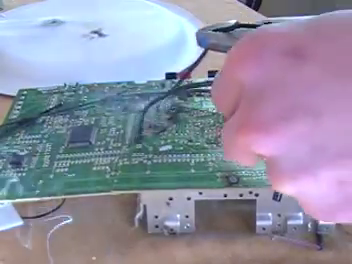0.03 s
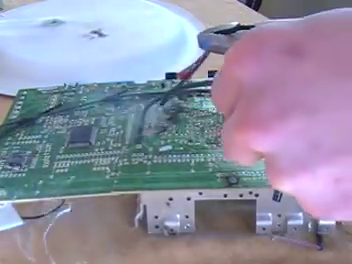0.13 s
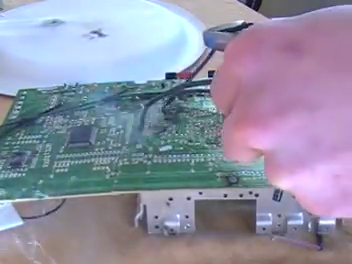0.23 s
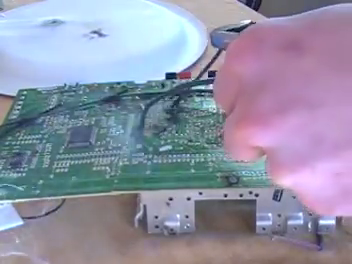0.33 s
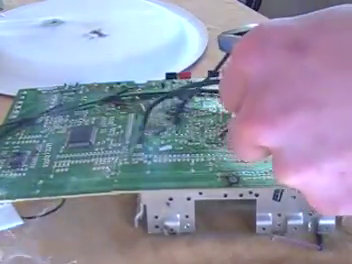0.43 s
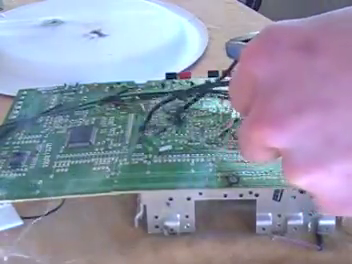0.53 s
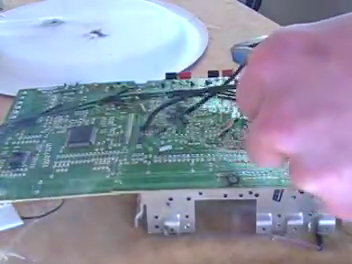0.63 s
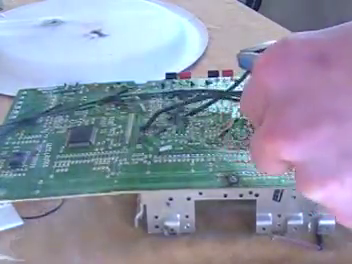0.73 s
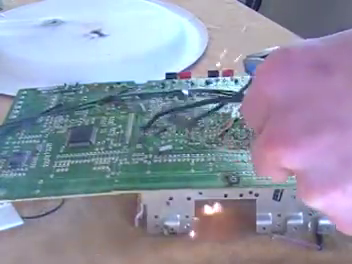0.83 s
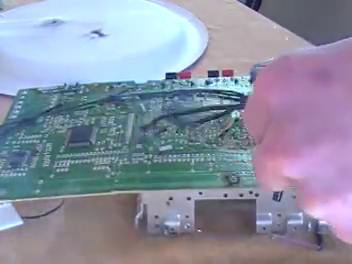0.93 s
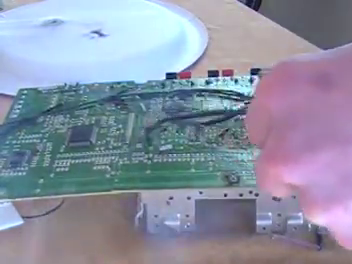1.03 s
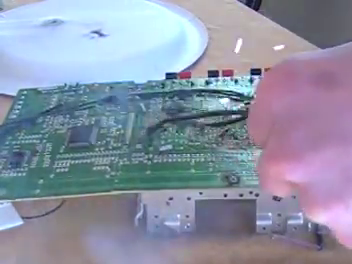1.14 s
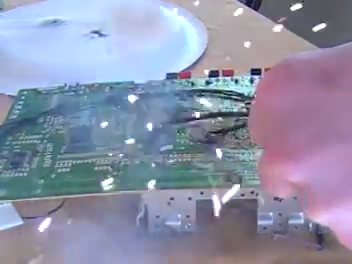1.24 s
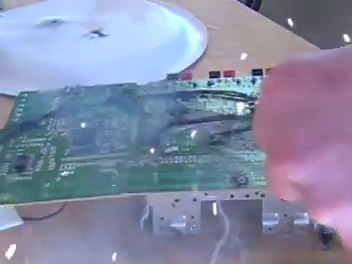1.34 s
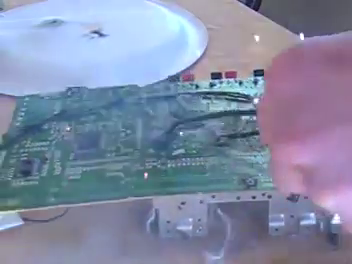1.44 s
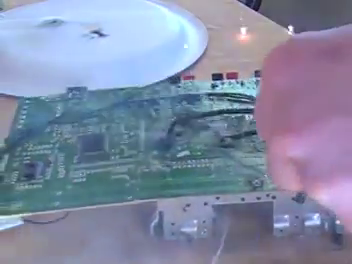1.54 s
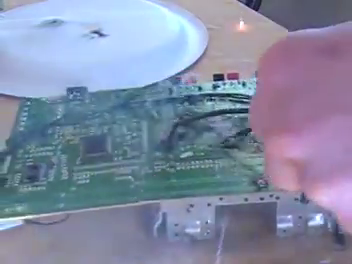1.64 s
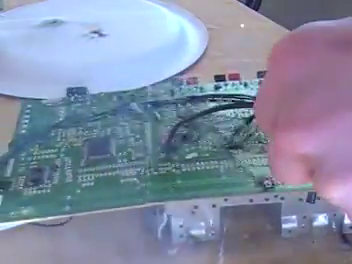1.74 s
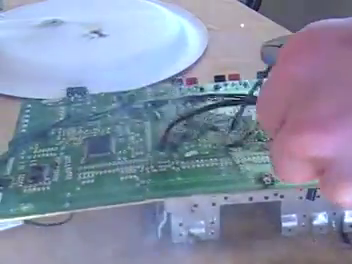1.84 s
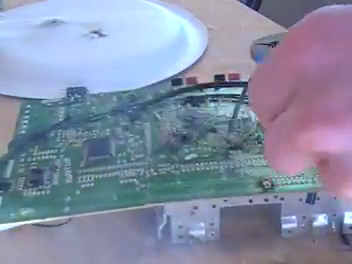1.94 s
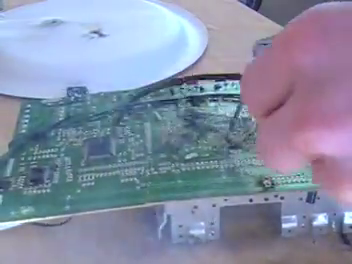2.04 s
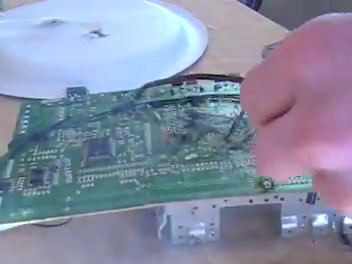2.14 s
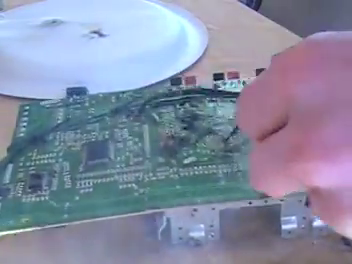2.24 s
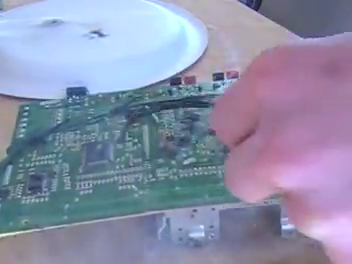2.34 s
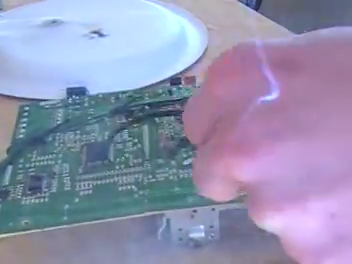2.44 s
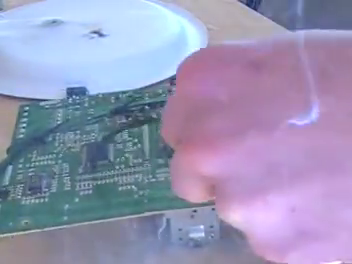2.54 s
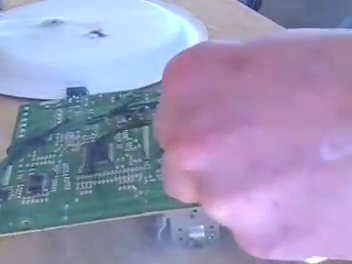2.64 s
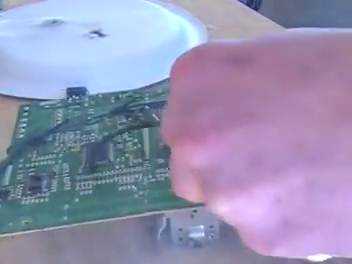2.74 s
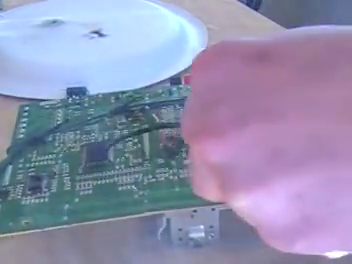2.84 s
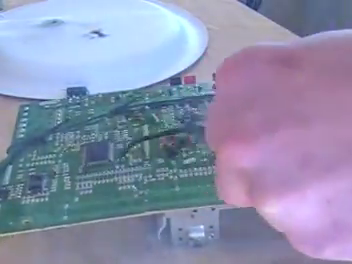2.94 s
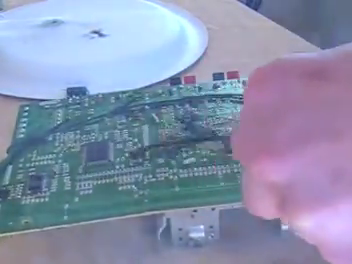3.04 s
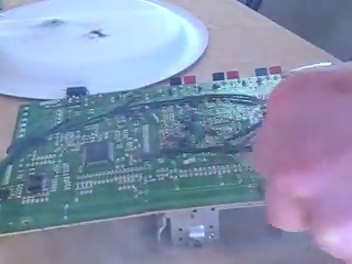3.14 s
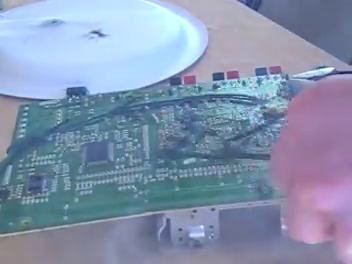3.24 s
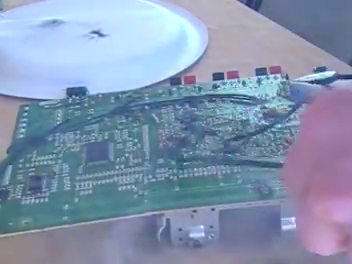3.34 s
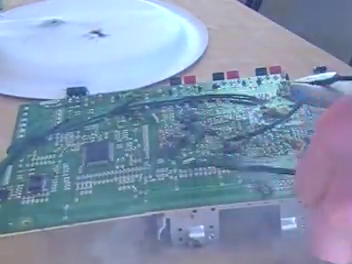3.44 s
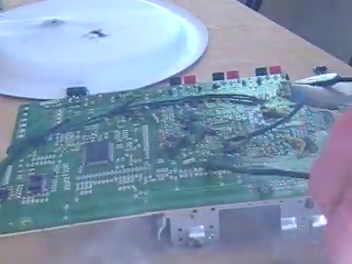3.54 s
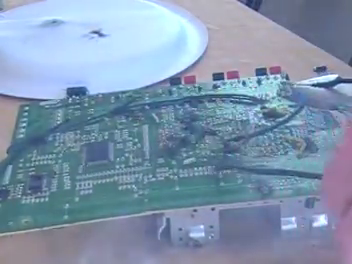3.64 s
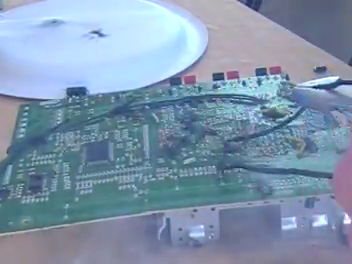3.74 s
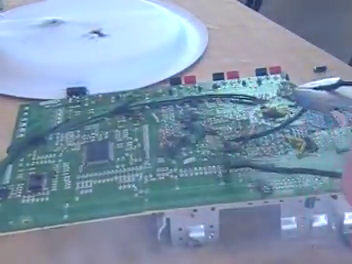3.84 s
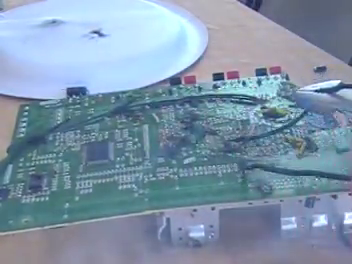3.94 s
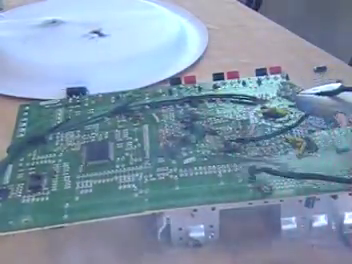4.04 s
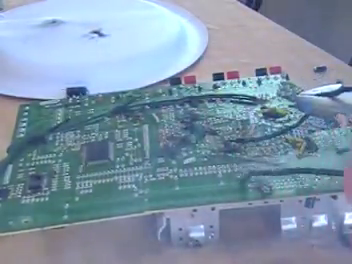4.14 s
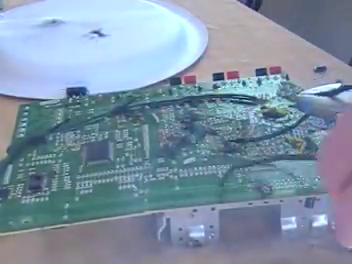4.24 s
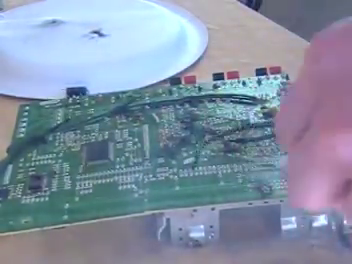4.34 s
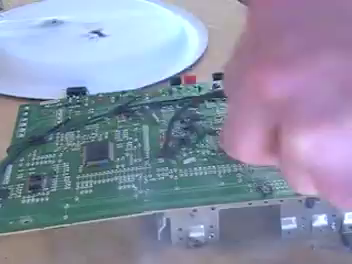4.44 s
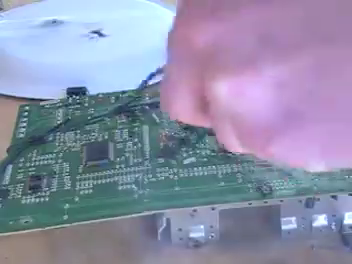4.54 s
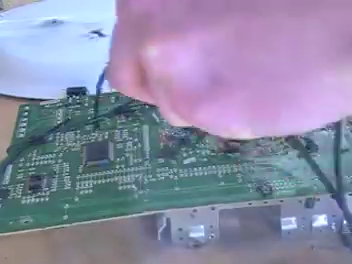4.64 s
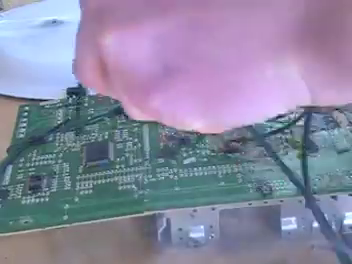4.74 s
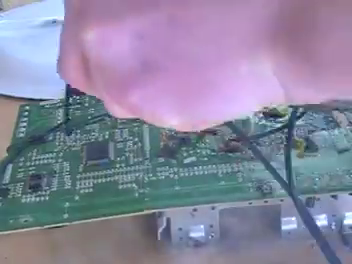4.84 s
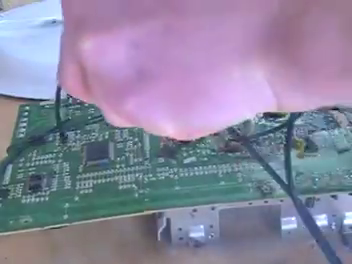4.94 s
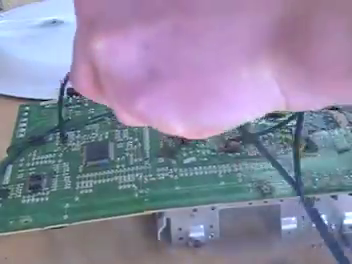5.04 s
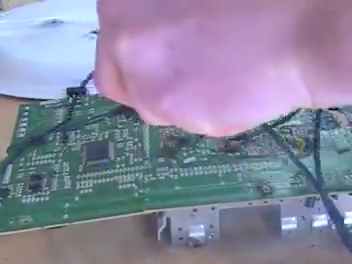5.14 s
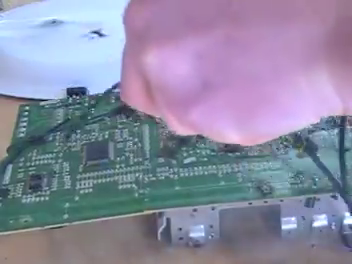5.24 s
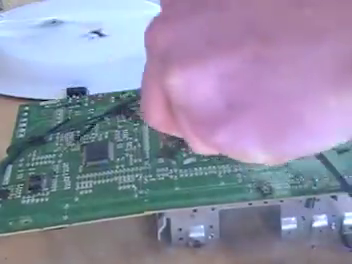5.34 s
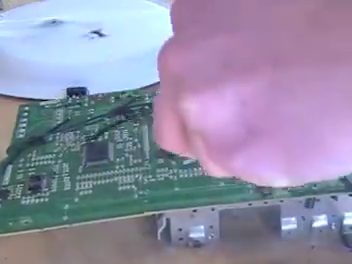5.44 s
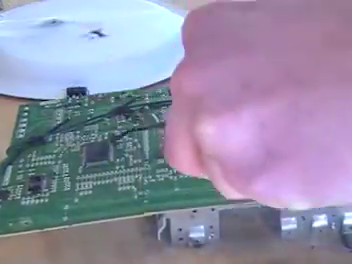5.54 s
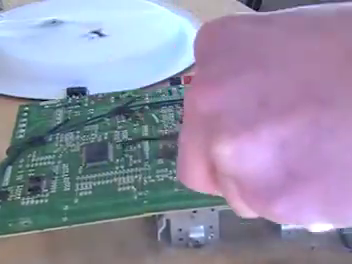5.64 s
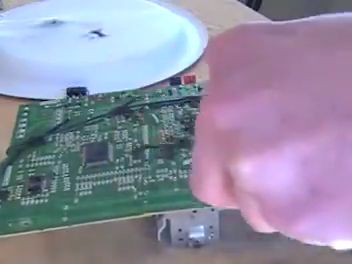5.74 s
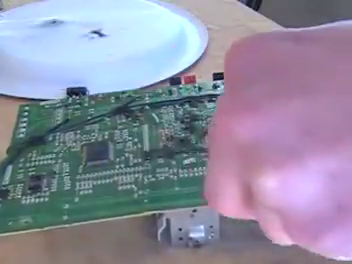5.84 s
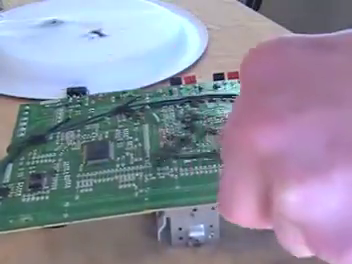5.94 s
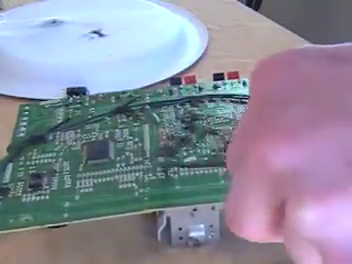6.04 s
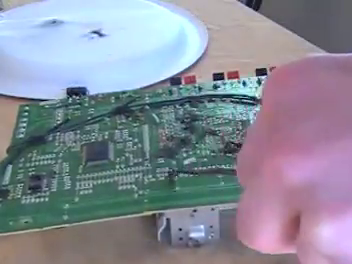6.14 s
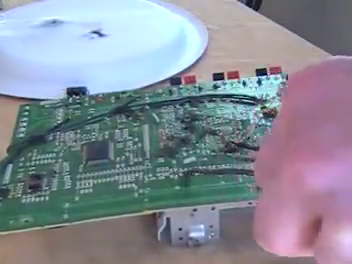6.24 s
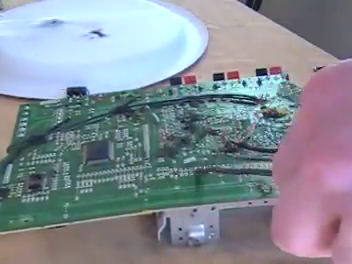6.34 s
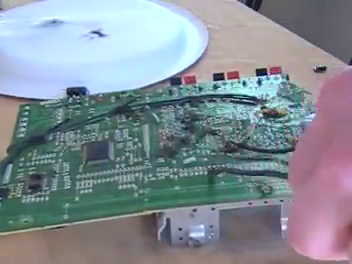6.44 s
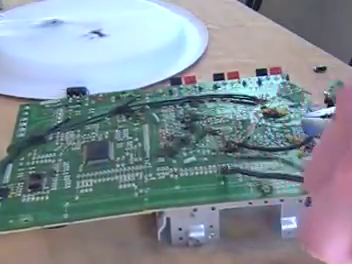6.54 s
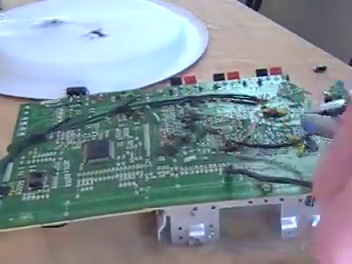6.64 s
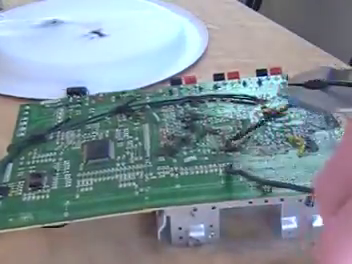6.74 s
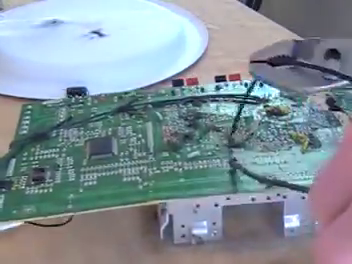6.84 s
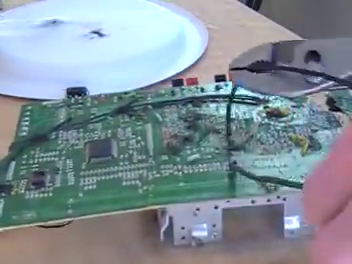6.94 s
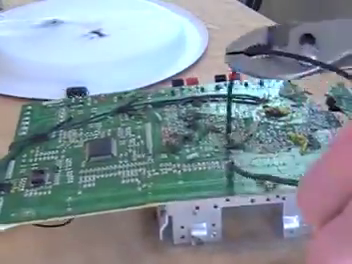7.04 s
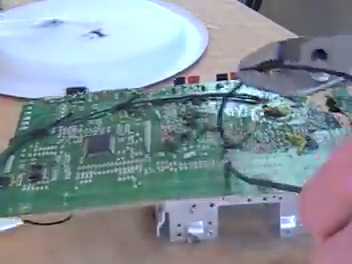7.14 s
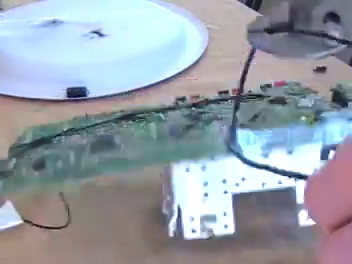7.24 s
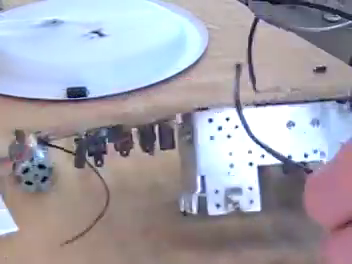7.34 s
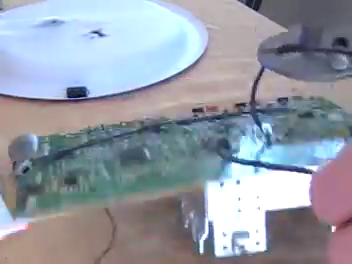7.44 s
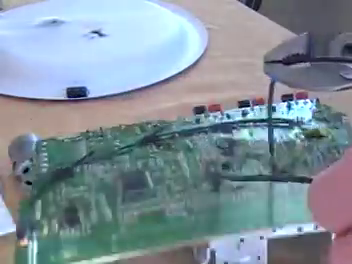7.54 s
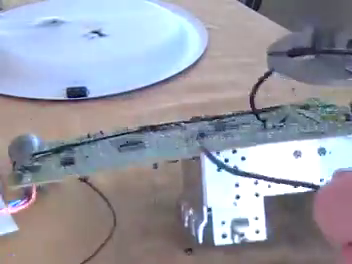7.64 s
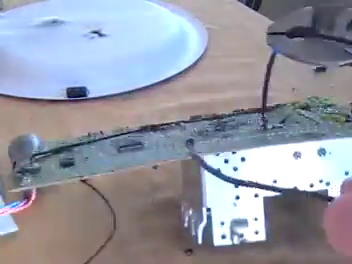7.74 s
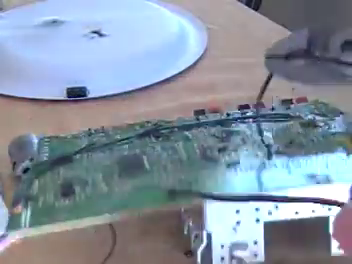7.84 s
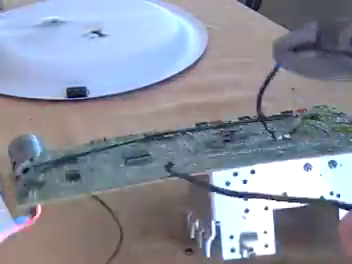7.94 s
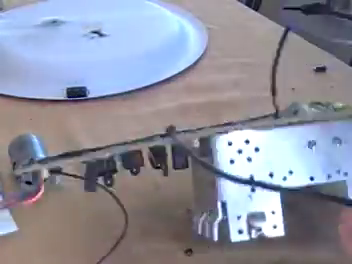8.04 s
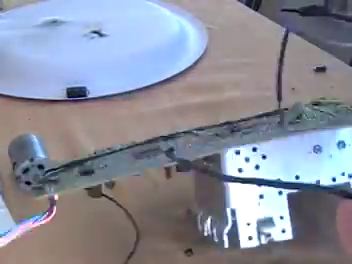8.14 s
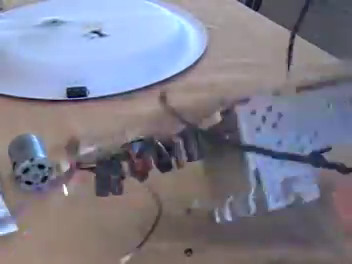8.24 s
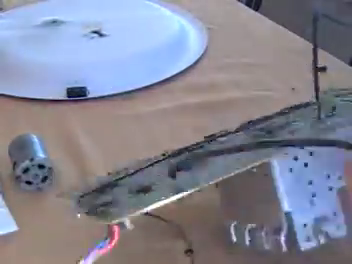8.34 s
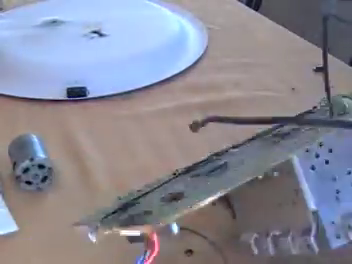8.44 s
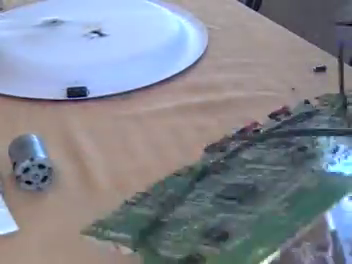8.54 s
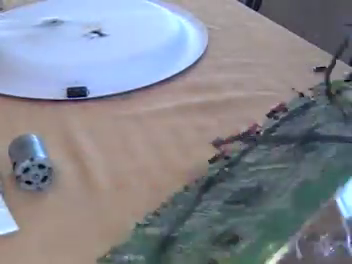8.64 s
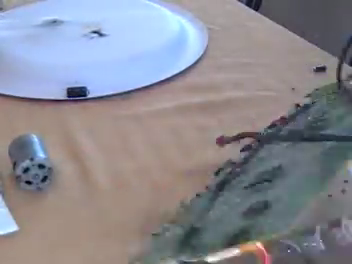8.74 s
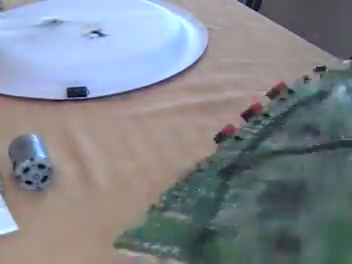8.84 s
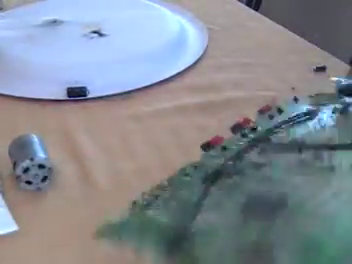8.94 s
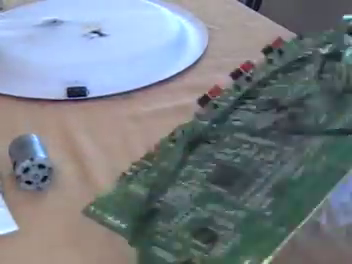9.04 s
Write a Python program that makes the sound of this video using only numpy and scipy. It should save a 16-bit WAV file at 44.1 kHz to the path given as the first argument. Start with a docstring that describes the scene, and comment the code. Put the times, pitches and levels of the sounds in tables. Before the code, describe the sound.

Close up on a workbench, sharp electrical cracks end in a fierce hissing burst, followed by small scratchy clicks and hard clacking of a tipped board.

```python
"""On a workshop bench, live mains wires are touched to a circuit board, heard from close by.
Arcs made of short noise bursts snap and sputter until a component bursts with a fierce, dulling hiss.
Before and after, wire tips tick, scratch and rasp: sharp clicks and fine grit ring through the wire.
Soft band-filtered swishes pass, then the board is tipped up and clatters: noise clacks over dying modes.
A soft room rush with a faint hum runs throughout, and a short noise tail gives the room's echo."""
import sys
import numpy as np
from scipy import signal
from scipy.fft import rfft, irfft, next_fast_len
from scipy.io import wavfile
from scipy.ndimage import uniform_filter1d

SR = 44100
rng = np.random.default_rng(int(sys.argv[2]) if len(sys.argv) > 2 else 0)


def store_wav(level_fs):
    """Save 16-bit WAV to argv[1]."""
    pcm = np.round(np.clip(np.atleast_2d(level_fs), -1, 1) * 32767)
    wavfile.write(sys.argv[1], SR, pcm.T.astype(np.int16))


N = 400869  # length in samples
TIME = np.arange(N) / SR  # seconds

# Levels in the tables and settings are starting points: the functions below trim many of them further.

# room tone, sinking after the burst and creeping back: start_s, level_db
ROOM_LEVEL = [(0, -68.5), (.6, -65.5), (1.3, -78.5), (1.8, -74), (2.4, -71.5), (3, -63), (5, -64),
              (9.09, -60)]
# tone colour of the room's rush: pitch_hz, level_db (per Hz)
ROOM_COLOUR = [(25, -18.5), (80, -15), (120, -10.5), (235, -2), (310, -6), (480, -2.5), (750, -3),
               (1080, -6), (1400, -8.5), (2400, -12.5), (4400, -20), (6400, -18.5), (7800, -17),
               (12500, -31.5)]
# how alike left and right are in the room tone: pitch_hz, correlation (limited when used)
ROOM_LIKENESS = [(60, -1.3), (270, -0.4), (1250, -0.18), (2700, -0.085), (5700, 0.58), (12000, -0.1)]
# faint steady pitches in the rush: pitch_hz, width_hz, level_db (against the rush)
ROOM_RESONANCES = [(684, 35, -4.5), (1080, 50, -4), (1830, 150, -4), (5700, 72, -6), (7550, 510, -7.5)]
# faint steady hum: pitch_hz, level_db
HUM_TONES = [(119, -20), (603, -17), (721, -11), (1082, -17.5)]
# how fast the workshop's echo dies: pitch_hz, time_to_fall_60_db_s
ECHO_DECAY = [(150, 0.14), (600, 0.15), (3000, 0.24), (10000, 0.19)]
# left-right difference of near sounds: pitch_hz, side_level_db (against the middle)
STEREO_WIDTH = [(100, -12.5), (500, -15.5), (1000, -16.5), (2200, -17), (4500, -16.5), (8000, -11),
                (12000, -4.5)]

# wire tips catching on solder joints: start_s, tick_level_db, treble_db
TICKS = [(0.201, -50.5, -1.5), (0.262, -57, 3), (0.29, -54.5, 6), (0.3895, -57, 2), (1.6617, -59, -1),
         (1.719, -60, -2), (1.915, -63, 0), (2.5705, -44.5, 3), (2.949, -41, -2.5), (2.9574, -33.5, -2),
         (3.046, -33.5, 1.5), (3.0563, -43, 1), (3.093, -36, -3.5), (3.125, -40.5, -8), (3.137, -47, -13),
         (3.1739, -36.5, -2), (3.199, -30.5, 1.5), (3.328, -38, 15.5), (3.342, -36, 18),
         (3.3866, -35, 13.5), (3.453, -40, -5), (3.4906, -31.5, -0.5), (3.5432, -37, -5),
         (3.6881, -43.5, -8), (3.841, -33, -1.5), (3.8837, -39, -7), (3.939, -51, -39), (4.905, -38, -7.5),
         (4.9185, -44.5, -7), (5.1924, -54, -9), (5.251, -43.5, -8), (5.293, -36.5, -2.5),
         (5.302, -37.5, -14), (5.3292, -31, -1), (5.4043, -40, -5), (5.4372, -33.5, -10),
         (5.629, -28.5, -2), (5.6493, -32.5, -6), (5.698, -29.5, -4), (5.8871, -30, -4.5), (6.0271, -38, 3),
         (6.042, -37.5, -2), (6.095, -43.5, -12), (6.527, -45, -4), (6.563, -35, -6), (6.7263, -49, 11.5),
         (6.9965, -47, -17)]
# strokes of the wire dragging over the board: start_s, length_s, level_db
DRAGS = [(2.96, 0.31, -54), (3.33, .12, -53.5), (3.5, 0.032, -48), (3.981, .2, -64), (5.186, 0.21, -60.5),
         (5.436, 0.71, -57.5), (5.48, 0.035, -43), (6.819, 0.038, -61), (6.948, 0.31, -62),
         (7.231, 0.1992, -43.5), (7.519, 0.056, -57.5), (7.606, 0.064, -44.5), (8.082, .15, -43.5),
         (8.42, 0.58, -48.5)]
# tone colour of ticks and scratches: pitch_hz, level_db (per Hz)
TICK_COLOUR = [(100, -57), (500, -12.5), (1000, -8.5), (1500, -4.5), (1900, -0.5), (3200, -3), (4300, -8),
               (5200, -3.5), (6200, 1), (7800, 2.5), (9000, -3.5), (10500, -6.5), (12000, -14.5)]
# resonances of the wire and pliers: pitch_hz, width_hz, level_db (against the direct sound)
WIRE_RESONANCES = [(1500, 140, -0.5), (1875, 83, -2.5), (2500, 70, -34), (3324, 146, -1.5),
                   (6110, 380, -0.5), (6800, 950, -7), (9000, 1400, -16.5)]

# arc snaps: start_s, snap_level_db, after_ring_db (against the snap), treble_db, bass_db
ARC_SNAPS = [(0.6354, -23, -16, 1.5, -8), (0.6686, -28, -9, 2.5, -11), (0.694, -8, -10.5, 7, -5),
             (0.7187, -20.5, -10, -0.5, 1), (0.7427, -8, -15, 3.5, -7.5), (0.7853, -4, -9, -4, 12),
             (0.7937, -12.5, -9, -3, 6), (0.8264, -9.5, -16, 0.5, 7.5), (0.9606, -32, -5.5, 14, 7.5),
             (1.11, -17, -17, -16.5, 6.5), (1.1126, -12, -2, 14, -4), (1.184, -13.5, -0.5, 1, -7)]
# bouts of sputtering while the arc holds: start_s, length_s, level_db
SPUTTERS = [(.613, .03, -51), (0.733, 0.062, -36.5), (.87, .1, -50), (0.986, .043, -29.5),
            (1.112, 0.014, -29)]
# hot air thrown out by the biggest arcs: start_s, peak_level_db, push_time_s
AIR_THUMPS = [(0.7866, -10, .0006), (1.1099, 1.5, 0.00085)]
# tone colour of the arcs: pitch_hz, level_db (per Hz)
ARC_COLOUR = [(25, -20.5), (60, -20.5), (200, -8), (450, -2), (900, 4.5), (1500, -2.5), (3000, 0.5),
              (4300, -4.5), (6000, 3), (7800, 2.5), (9500, -8.5), (12000, -13.5)]
# tone colour of the bursting component's hiss: pitch_hz, level_db (per Hz)
VENT_COLOUR = [(60, -29), (250, -21.5), (500, -6.5), (1000, 0), (1700, 2.5), (3300, 2), (4000, -2),
               (4800, -13), (6000, -9), (8000, -8), (9800, -13.5), (12000, -25.5)]

# a wire tip rasping on the board: start_s, length_s, level_db, pitch_hz
RASPS = [(3.881, 0.063, -60, 1660), (4.022, 0.092, -68, 1920), (5.774, 0.036, -48.5, 1575),
         (5.839, 0.061, -49, 1534), (5.99, 0.024, -43.5, 1494), (6.086, 0.027, -52.5, 1520),
         (6.82, 0.028, -71, 1830), (6.984, 0.017, -53, 1396)]
# soft swishes as the wires slide into a new position: start_s, length_s, level_db, centre_hz
SWISHES = [(4.02, 0.29, -66, 6200), (4.271, .65, -72, 9600), (5.461, 0.081, -39, 7440)]

# the board and its metal shield knocking on the bench: start_s, clack_level_db, thud_level_db, treble_db
KNOCKS = [(6.843, -50.5, -69, -10), (7.1764, -44, -47.5, -1.5), (7.1996, -36, -53.5, 3),
          (7.2389, -39, -60, 0), (7.256, -34, -43.5, 1), (7.2892, -28, -63, -8.5),
          (7.3047, -28.5, -33.5, -12), (7.3523, -32.5, -40, -5), (7.431, -46, -25.5, -3.5),
          (7.5187, -40, -63, -5), (7.5581, -38, -73, 17), (7.622, -38, -71, 2), (7.6604, -33.5, -58, 0),
          (7.8049, -35, -41, -3), (7.8967, -31.5, -52.5, 2.5), (7.9269, -40, -47, -2),
          (7.9736, -20, -28, -6), (8.0686, -22.5, -27, -4.5), (8.108, -35, -51, -6),
          (8.144, -33, -31.5, -5), (8.1837, -29, -34, -3), (8.2181, -26.5, -41.5, -3),
          (8.302, -8.5, -31.5, -6.5), (8.425, -23, -35.5, -6.5), (8.5622, -18.5, -24, -2.5),
          (8.6296, -39.5, -36.5, -8), (8.689, -39, -25, 0), (8.7754, -11.5, -33, -10),
          (8.7843, -25, -48, 3), (8.8051, -13, -25.5, -3.5), (8.8399, -19.5, -39, -4.5),
          (8.9048, -12.5, -38.5, -11), (8.913, -20, -48, 9), (8.9321, -16.5, -33.5, -9),
          (8.9587, -8.5, -27, -9), (8.9887, -19, -42, -6), (9.0427, -17.5, -48, -3.5)]
# bending modes of the board: pitch_hz, level_db, time_to_fall_60_db_s
BOARD_MODES = [(128, -20, 0.24), (228, -15.5, 0.23), (305, -15.5, 0.12), (453.4, -3, 0.16),
               (504.7, -0.5, 0.071), (615, -6, 0.091), (701.4, -6, 0.088), (874, -7, 0.049),
               (988, -5, 0.024), (1235, -16.5, 0.033), (1380, -37.5, 0.6)]
# modes of the metal shield: pitch_hz, level_db, time_to_fall_60_db_s
SHIELD_MODES = [(1470, 0, 0.1), (1660, -23, 0.11), (1900, -8, 0.1), (2070, -20.5, 0.16), (2650, 3, 0.15),
                (3075, 15.5, 0.051), (2957, 1.5, 0.083), (3410, 3, 0.12), (3680, -19, 0.32),
                (5700, -17, 0.12), (5770, 0, 0.064), (6100, -5.5, 0.045), (6850, -26, 0.078),
                (6960, -38, 0.035)]
# tone colour of the hard clacks: pitch_hz, level_db (per Hz)
CLACK_COLOUR = [(30, -43), (200, -23), (330, -17), (480, -13.5), (900, -5), (1500, 2), (2200, -1),
                (3200, -4), (4300, -2.5), (6000, 3), (7600, 4.5), (9500, -5.5), (12000, -17.5)]
# the dull answer of the wooden bench: pitch_hz, level_db (per Hz)
BENCH_COLOUR = [(50, 9.5), (120, -12), (230, 0), (330, -1.5), (520, 9), (900, -4), (1800, -34), (5000, -64)]

EDGE_HZ = 12650  # upper limit of the sound
LEAD_S = .005  # faint lead-in ahead of each snap, tick or clack

# after-ring against the tick; after each catch the tip skips once, later and softer
TICK_RING_DB = -3.5
SKIP_S, SKIP_DB = .013, -9
# a dragged tip also snags at random: rate, level over the scratching, and scatter
SNAGS_PER_S, SNAG_DB, SNAG_SPREAD_DB = 16, 9.5, 4.5
DRAG_RISE_S, DRAG_FADE_DB_PER_S = 0.005, 196

# a held arc strikes again on every half cycle of the mains: level over the sputter, and scatter
MAINS_HZ = 60
RESTRIKE_DB, RESTRIKE_SPREAD_DB = 1.5, 5
# hiss of the bursting component: start, time before it falls, level, and fall as it empties
VENT_S, VENT_HOLD_S, VENT_DB, VENT_FADE_DB_PER_S = 1.183, 0.012, -14, 162
# specks falling back on the bench
DEBRIS_S, DEBRIS_LENGTH_S, DEBRIS_DB = 1.617, 0.094, -70
RASP_RISE_S, RASP_FADE_DB_PER_S = 0.0048, 255

# the knock's after-ring takes a share of both clack and thud, each given against its source
RING_FROM_CLACK_DB, RING_FROM_THUD_DB = -11.5, -8
# louder clacks tilt the bending towards higher modes, softer ones away (dB per octave for each dB)
SOFT_CLACK_DB, TILT_PER_DB = -37.5, 0.7347
# the board rebounds once after each knock, later and softer
REBOUND_S, REBOUND_DB = .013, -8.5


def amp(db):
    """Turns decibels into gain."""
    return np.exp(np.asarray(db) * (np.log(10) / 20))


def unit(x):
    """Scales a sound to an rms level of 1."""
    return x / np.sqrt(np.mean(x ** 2) + 1e-20)


def read(points, hz):
    """Reads a table between its points along a log-frequency axis."""
    table_hz, value = np.transpose(points)
    return np.interp(np.log(hz + 1), np.log(table_hz), value)


def add(mix, s, sound):
    """Mixes a stereo sound in at time s."""
    part = mix[:, max(round(s * SR), 0):][:, :sound.shape[1]]
    part += sound[:, :part.shape[1]]


def held(rows, rise_s, fade_db_per_s):
    """Gain over time: each row (start, length, level) rises, holds and dies away."""
    gain = np.zeros(N)
    for s, length, db, *_ in rows:
        on = (TIME > s) & (TIME < s + length + 1)
        t = TIME[on] - s
        gain[on] += np.minimum(t / rise_s, 1) * amp(db - fade_db_per_s * np.maximum(t - length, 0))
    return gain


def coloured(pair, colour, treble_db=0, bass_db=0, ripple_db=0, top_share=.2, size=2048):
    """Gives two unrelated white signals a tone colour and stereo width; the filter never sounds early."""
    hz = abs(np.fft.fftfreq(size, 1 / SR))
    treble = 1 / (1 + (4400 / (hz + 1)) ** 6) + top_share / (1 + (9000 / (hz + 1)) ** 8)
    bass = 1 / (1 + (hz / 1100) ** 4)
    db = read(colour, hz) + treble_db * treble + bass_db * bass
    # each spot struck has its own resonances
    knots = np.geomspace(500, EDGE_HZ, size // 50)
    db += ripple_db * np.interp(hz, knots, rng.standard_normal(len(knots)))
    # the middle filter has unit energy below the edge
    gain = amp(db) / np.sqrt(np.mean(amp(db) ** 2 * (hz < EDGE_HZ)))
    log_gain = np.log([gain, gain * amp(read(STEREO_WIDTH, hz))])
    # the Hilbert transform finds the phase that puts all the filter's response after the sound
    taps = np.fft.ifft(np.exp(np.conj(signal.hilbert(log_gain)))).real
    mid, side = signal.oaconvolve(pair, taps, axes=1)[:, :pair.shape[1]]
    return np.array([mid + side, mid - side])


def crack(crack_s, ring_db, ring_t60, lead_db, chatter_db=0, size=6000):
    """A faint lead-in, a white burst LEAD_S later, then a dense, uneven noise ring that dies away."""
    t, lead = np.arange(size) / SR, round(LEAD_S * SR)
    burst, ring = rng.standard_normal((2, 2, size))
    # flatten the burst's spectrum, then scale it to rms 1 over 3 ms
    spectrum = rfft(burst * np.exp(-t / crack_s))
    burst = irfft(spectrum / np.sqrt(uniform_filter1d(abs(spectrum) ** 2, size=300)))
    burst *= np.sqrt(.003 * SR) * (t < .05)
    # quick random changes of level in the ring
    chatter = unit(uniform_filter1d(rng.standard_normal(size), size=50, mode="wrap"))
    ring = ring * unit(amp(chatter_db * np.minimum(chatter, 2)))
    ring_fade = amp(ring_db - 60 * t / ring_t60) * (1 - np.exp(-t / 0.00025))
    lead_in = rng.standard_normal((2, lead)) * amp(lead_db) * np.linspace(0, 1, lead) ** 2
    return np.hstack([lead_in, burst + ring * ring_fade])


def grit(per_s, spread_db, hiss):
    """Random tiny clicks of uneven size mixed with smooth hiss."""
    happens = rng.random(N) < per_s / SR
    sizes = amp(spread_db * np.minimum(rng.exponential(1, N), 3.5)) * happens
    clicks = unit(sizes * rng.choice([-1, 1], (2, N)))
    return unit(clicks + hiss * rng.standard_normal((2, N)))


def resonant(x, modes):
    """Adds narrow resonances to a sound and keeps its overall level."""
    size = next_fast_len(N + SR // 10)
    hz = np.fft.rfftfreq(size, 1 / SR) + 1
    gain = 1
    for centre, width, db in modes:
        gain = gain + amp(db) / (1 + 1j * (hz ** 2 - centre ** 2) / (hz * width))
    return unit(irfft(rfft(x, size) * gain, size)[:, :N]) * np.sqrt(np.mean(x ** 2))


def room_tone():
    """A soft, wide rush of filtered noise with a faint hum of steady sines."""
    size = next_fast_len(N)
    hz = np.fft.rfftfreq(size, 1 / SR)
    a, b = rfft(rng.standard_normal((2, size))) * amp(read(ROOM_COLOUR, hz)) * (hz < EDGE_HZ)
    # the right side shares part of the left, by pitch
    same = np.clip(read(ROOM_LIKENESS, hz), -.65, 1)
    rush = unit(irfft([a, same * a + np.sqrt(1 - same ** 2) * b], size)[:, :N])
    hum = sum(amp(db) * np.sin(2 * np.pi * (tone_hz * TIME + rng.random())) for tone_hz, db in HUM_TONES)
    level = amp(5.0 + np.interp(TIME, *np.transpose(ROOM_LEVEL)))
    return level * (resonant(rush, ROOM_RESONANCES) + amp(-5) * hum)


def catches(skip_treble_db=-4, snag_treble_db=-4.5, treble_spread_db=6):
    """Lists the main ticks, a duller skip after each, and chance snags along the strokes."""
    rows = list(TICKS)
    for (s, db, treble_db), late in zip(TICKS, rng.random(len(TICKS))):
        rows.append((s + SKIP_S * (.5 + late), db + SKIP_DB, treble_db + skip_treble_db))
    for start, length, db in DRAGS:
        for s in np.arange(start, start + length, 1 / SNAGS_PER_S):
            snag_s = s + rng.random() / SNAGS_PER_S
            strength, edge = np.clip(rng.standard_normal(2), -2, 2)
            if snag_s < start + length:
                snag_db = db + SNAG_DB + SNAG_SPREAD_DB * strength
                rows.append((snag_s, snag_db, snag_treble_db + treble_spread_db * edge))
    return rows


def wire():
    """The tip ticks sharply on joints and scratches finely along strokes; both ring the wire."""
    scratch = coloured(grit(700, 8.3, 1.0), TICK_COLOUR, -9.5)
    out = amp(-4.5) * held(DRAGS, DRAG_RISE_S, DRAG_FADE_DB_PER_S) * scratch
    out = resonant(out, WIRE_RESONANCES)  # steady rubbing builds the resonances up further
    for s, db, treble_db in catches():
        tick = crack(0.0012, TICK_RING_DB, 0.042, lead_db=-6.0, chatter_db=4.5)
        add(out, s - LEAD_S, amp(db - 0.5) * coloured(tick, TICK_COLOUR, treble_db, ripple_db=3))
    return resonant(out, WIRE_RESONANCES)


def restrikes(ring_db=-4, treble_db=1.5, bass_db=2.5):
    """Lists small snaps of uneven strength, one on each mains half cycle while the arc sputters."""
    rows = []
    for start, length, db in SPUTTERS:
        for s in np.arange(start, start + length, .5 / MAINS_HZ):
            scatter_db = RESTRIKE_SPREAD_DB * np.clip(rng.standard_normal(), -2, 2)
            rows.append((s, db + RESTRIKE_DB + scatter_db, ring_db, treble_db, bass_db))
    return rows


def arcs(size=2000):
    """Strikes are shocks of hot air that also shake the board; the arc sputters in separate bouts."""
    sputter = coloured(grit(1800, 1.8, 0.98), ARC_COLOUR)
    out = amp(-3.0) * held(SPUTTERS, rise_s=.006, fade_db_per_s=521) * sputter
    for s, db, ring_db, treble_db, bass_db in ARC_SNAPS + restrikes():
        snap = crack(0.0021, ring_db - 0.5, 0.12, lead_db=-15.0, chatter_db=5.5)
        snap = coloured(snap, ARC_COLOUR, treble_db, bass_db, ripple_db=-0.33)
        add(out, s - LEAD_S, amp(db + 1.0) * snap)
    for s, db, push_s in AIR_THUMPS:
        u = np.arange(size) / SR / push_s
        add(out, s, amp(db) * np.tile((u - 1) * np.exp(-u), (2, 1)))  # a push, then a longer suck
    return out


def vent():
    """Gas rushes from the burst component; the jet fades and dulls as the pressure falls."""
    jet = grit(4000, 3.2, .8)
    fresh = np.clip(1 - (TIME - VENT_S) / 0.29, 0, 1)
    bright, dull = coloured(jet, VENT_COLOUR, 0.55), coloured(jet, VENT_COLOUR, -7.0)
    pressure = held([(VENT_S, VENT_HOLD_S, VENT_DB)], rise_s=0.00388, fade_db_per_s=VENT_FADE_DB_PER_S)
    return pressure * (fresh * bright + (1 - fresh) * dull)


def debris():
    """Specks thrown out by the burst patter faintly: sparse clicks over a little hiss."""
    patter = held([(DEBRIS_S, DEBRIS_LENGTH_S, DEBRIS_DB)], rise_s=.03, fade_db_per_s=122)
    return patter * coloured(grit(350, 4, .3), TICK_COLOUR, treble_db=-1)


def rasp(width_hz=70, waver=0.021, flutter_db=3, overtone_db=-11, size=900):
    """Fast little slips of the tip feed a wire resonance whose pitch and level waver."""
    s, length, _, hz = np.transpose(RASPS)
    flutter, bend = (unit(uniform_filter1d(uniform_filter1d(x, size), size // 2))
                     for x in rng.standard_normal((2, N)))
    pitch_hz = np.interp(TIME, s + length / 2, hz) * (1 + waver * bend)
    turn = np.exp(2j * np.pi * np.cumsum(pitch_hz) / SR)
    slips = coloured(grit(700, 0.8, 0.081), TICK_COLOUR)
    r = np.exp(-np.pi * width_hz / SR)
    # shift the wanted pitch down to zero, smooth, and shift back: a resonance that can glide
    first, second = (unit((w * signal.lfilter([1 - r], [1, -r], slips / w)).real)
                     for w in (turn, turn ** 2))
    level = amp(-2.5 + flutter_db * flutter) * held(RASPS, RASP_RISE_S, RASP_FADE_DB_PER_S)
    return level * (first + amp(overtone_db) * second)


def swish(half_band_hz=900):
    """Smooth sliding gives a fine hiss in one broad band that swells and sinks."""
    out, hiss = np.zeros((2, N)), grit(2700, 3, .9)
    for s, length, db, hz in SWISHES:
        on = (TIME >= s) & (TIME < s + length)
        band = signal.butter(1, [hz - half_band_hz, hz + half_band_hz], "bandpass", fs=SR)
        swell = np.sin(np.pi * (TIME[on] - s) / length)
        mid, side = unit(signal.lfilter(*band, hiss[:, on])) * swell
        side = amp(-11) * side
        add(out, s, amp(db) * np.array([mid + side, mid - side]))
    return out


def blows():
    """Lists the knocks and the lighter rebound after each."""
    rows = list(KNOCKS)
    for (s, db, thud_db, treble_db), late in zip(KNOCKS, rng.random(len(KNOCKS))):
        rows.append((s + REBOUND_S * (.5 + late), db + REBOUND_DB, thud_db + REBOUND_DB, treble_db))
    return rows


def ring_out(modes, tilt_db, shift, uneven_db, contact_s, size=7000):
    """Dying sine modes; each blow lands elsewhere and finds the board held differently."""
    t = np.arange(size) / SR
    hz, db, t60 = np.transpose(modes)[:, :, None]
    detune, strength, angle = rng.standard_normal((3, len(modes), 1))
    db = db + uneven_db * strength + tilt_db * np.clip(np.log2(hz / 470), 0, 1)
    waves = amp(db - 60 * t / t60) * np.sin(2 * np.pi * (hz * (1 + shift * detune) * t + angle))
    side = amp(read(STEREO_WIDTH, hz)) * rng.standard_normal(hz.shape)  # each mode radiates its own way
    both = np.array([(waves * (1 + side)).sum(0), (waves * (1 - side)).sum(0)])
    return both * (1 - np.exp(-t / contact_s))


def board(radiate_hz=170):
    """Each knock is a hard clack, the shield's ring, the board's bending and the bench's dull answer."""
    hard, bending = np.zeros((2, 2, N))
    for s, db, thud_db, treble_db in blows():
        ring_shares = amp(RING_FROM_CLACK_DB), amp(thud_db - db + RING_FROM_THUD_DB)
        ring_db = 20 * np.log10(np.hypot(*ring_shares))
        tilt_db = TILT_PER_DB * (db - SOFT_CLACK_DB)
        clack = crack(0.0024, ring_db, 0.15, lead_db=-15.5, chatter_db=5.5)
        clack = coloured(clack, CLACK_COLOUR, treble_db, ripple_db=3)
        shield = ring_out(SHIELD_MODES, 0, shift=0.0024, uneven_db=6, contact_s=0.00085)
        bend = ring_out(BOARD_MODES, tilt_db, shift=0.034, uneven_db=0.5, contact_s=0.00012)
        bench = coloured(crack(0.0029, -3.5, 0.42, lead_db=-34), BENCH_COLOUR)
        add(hard, s - LEAD_S, amp(db + 1.75) * clack)
        add(hard, s, amp(db + ring_db - 15.0) * shield)
        add(bending, s, amp(thud_db + 2) * bend)
        add(bending, s - LEAD_S, amp(thud_db - 12.5) * bench)
    # so small a plate radiates little bass
    return hard + signal.lfilter(*signal.butter(2, radiate_hz, "high", fs=SR), bending)


def workshop(x, size=26000):
    """Diffuse reflections from bench and walls: a noise tail whose bands die at their own speeds."""
    hz, t, z = signal.stft(rng.standard_normal((2, size)), SR, nperseg=256)
    z = z * amp(-60 * t / read(ECHO_DECAY, hz)[:, None]) * (1 - np.exp(-t / 0.0009))
    z[1] *= amp(read(STEREO_WIDTH, hz) + 0.5)[:, None]
    mid, side = signal.istft(z, SR, nperseg=256)[1]
    tail = np.array([mid + side, mid - side]) / np.linalg.norm(mid)
    return signal.fftconvolve(x.mean(0)[None], tail, axes=1)[:, :N]


def scene():
    """Adds all sources on the bench, their echo and the room tone."""
    sparks = arcs() + vent() + debris()
    scratches = wire() + rasp() + swish()
    knocks = board()
    echo = workshop(amp(-13.5) * sparks + amp(-11) * scratches + amp(-15.0) * knocks)
    return sparks + scratches + knocks + echo + room_tone()


def record(dry):
    """Limits the band, clips peaks as an overloaded microphone does, and limits the band again."""
    low_pass = signal.firwin(401, EDGE_HZ, window=("kaiser", 7), fs=SR)[None]
    clipped = np.clip(signal.oaconvolve(dry, low_pass, "same", axes=1), -1, 1)
    return signal.oaconvolve(clipped, low_pass, "same", axes=1)


dry = scene()
out = record(dry)
store_wav(out)
```